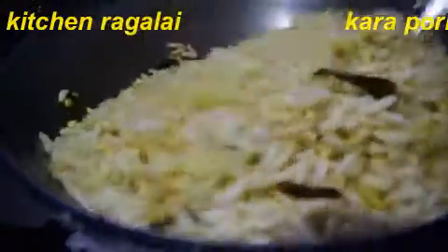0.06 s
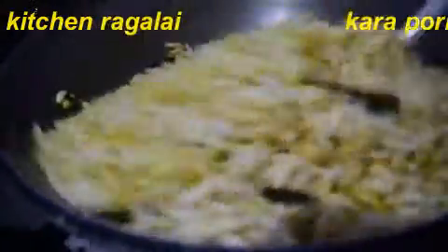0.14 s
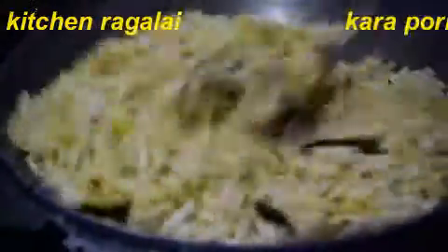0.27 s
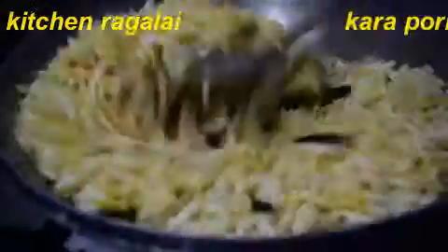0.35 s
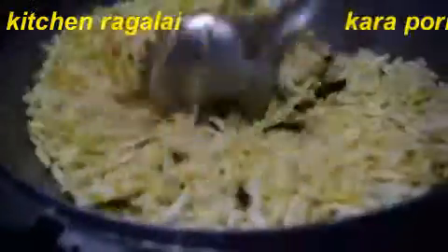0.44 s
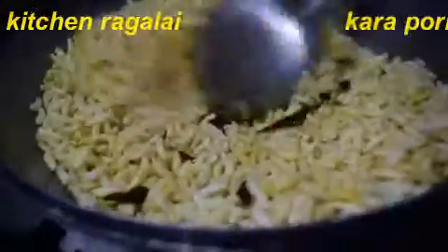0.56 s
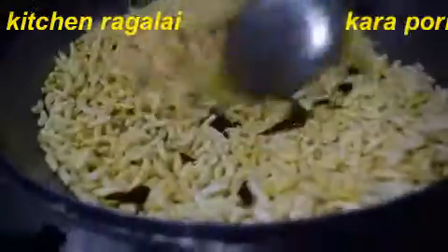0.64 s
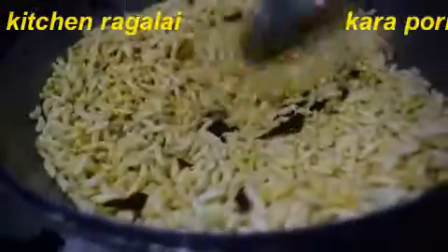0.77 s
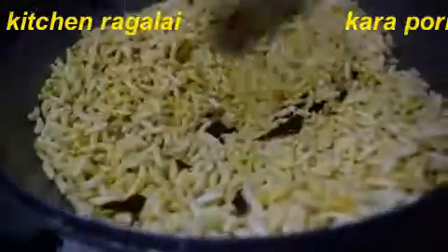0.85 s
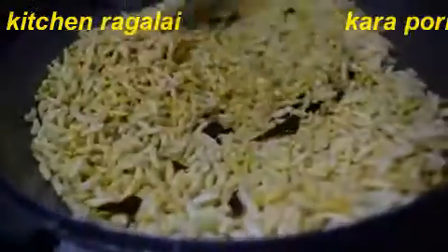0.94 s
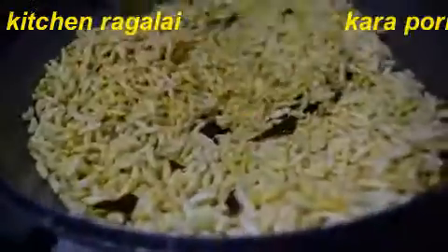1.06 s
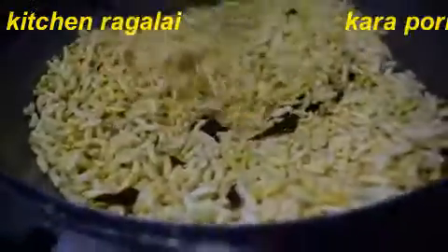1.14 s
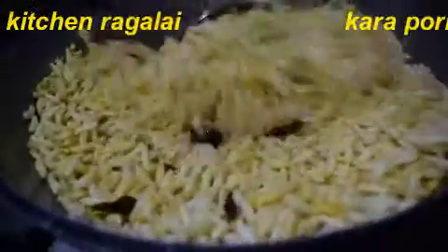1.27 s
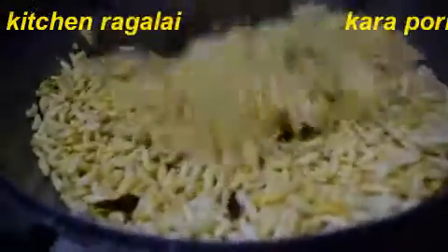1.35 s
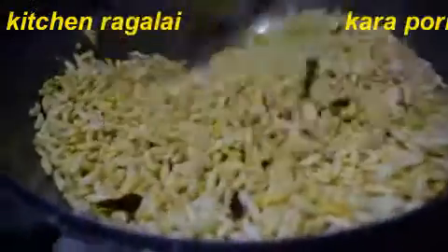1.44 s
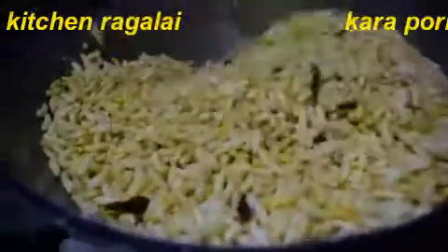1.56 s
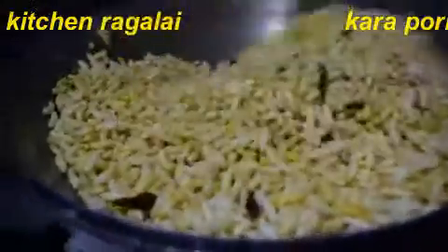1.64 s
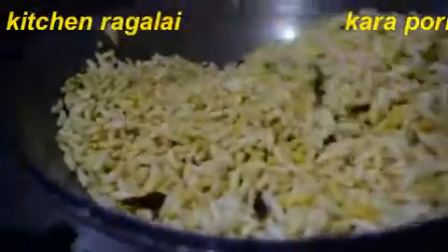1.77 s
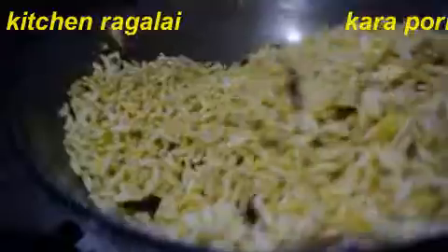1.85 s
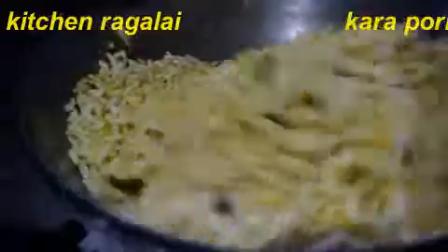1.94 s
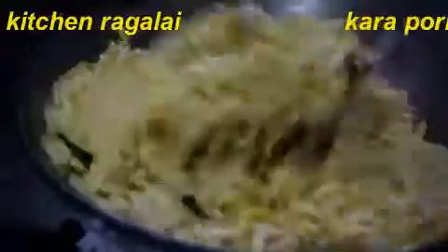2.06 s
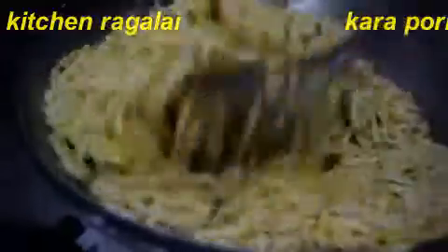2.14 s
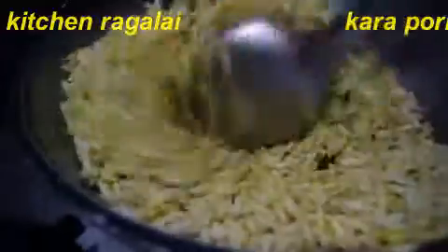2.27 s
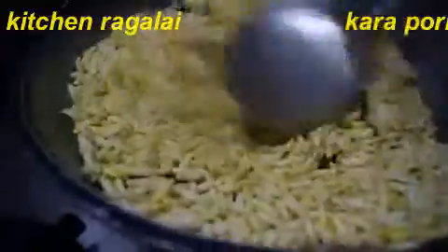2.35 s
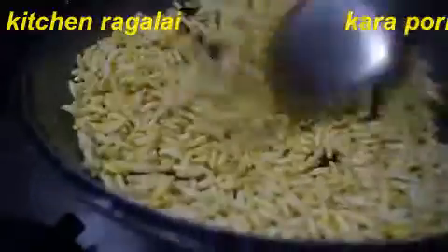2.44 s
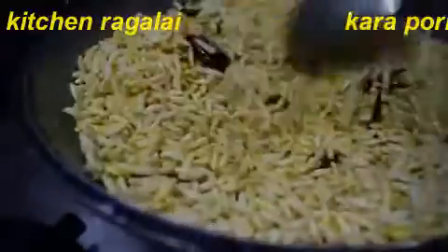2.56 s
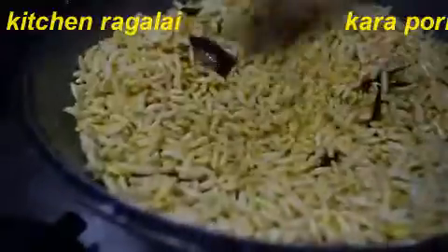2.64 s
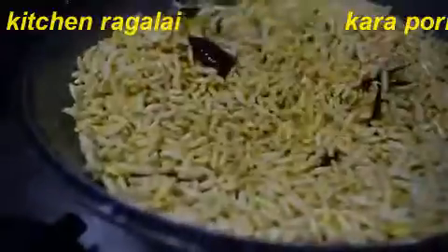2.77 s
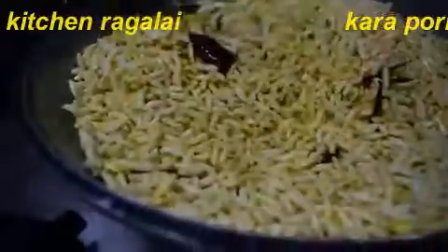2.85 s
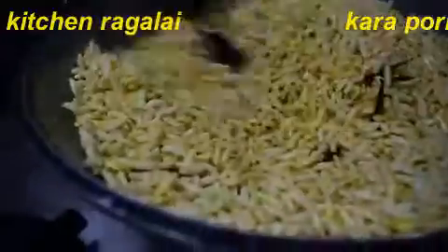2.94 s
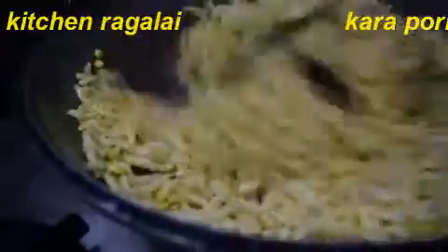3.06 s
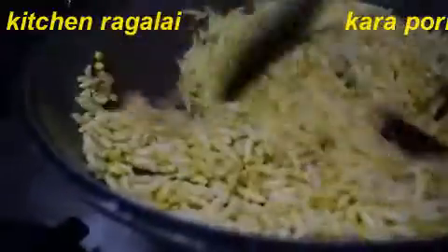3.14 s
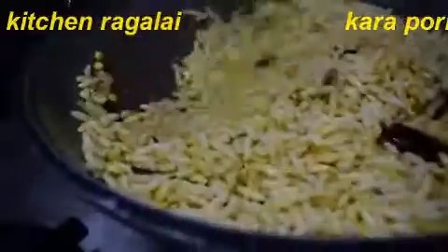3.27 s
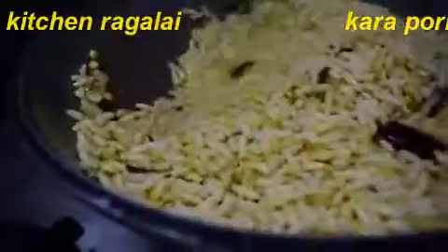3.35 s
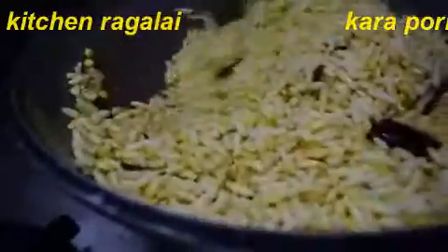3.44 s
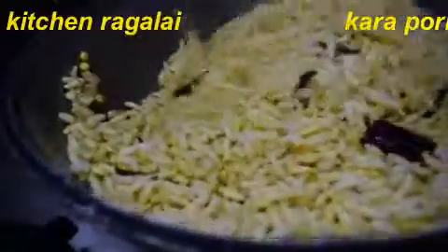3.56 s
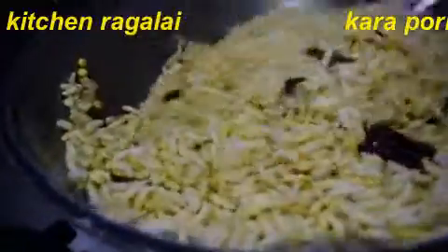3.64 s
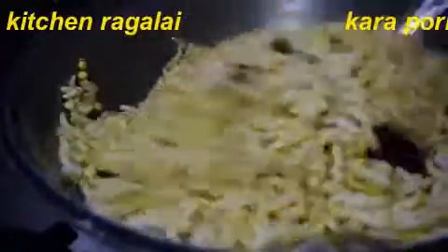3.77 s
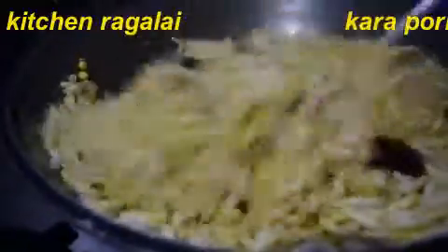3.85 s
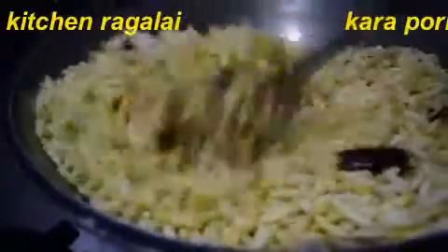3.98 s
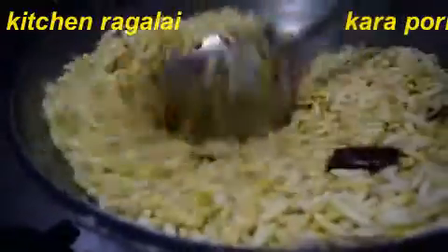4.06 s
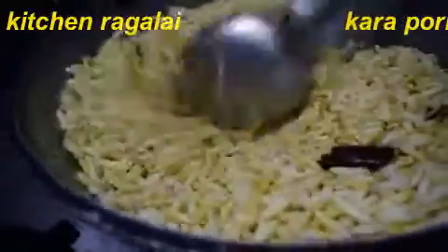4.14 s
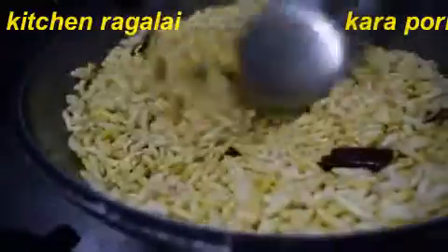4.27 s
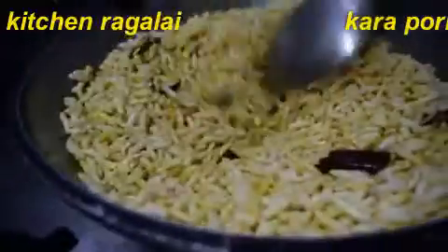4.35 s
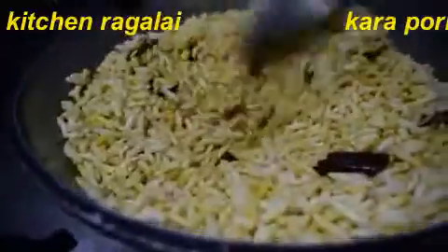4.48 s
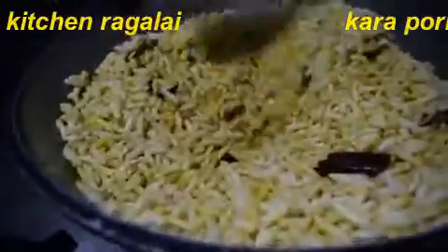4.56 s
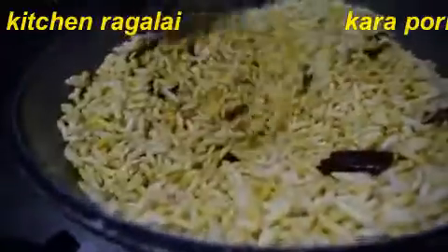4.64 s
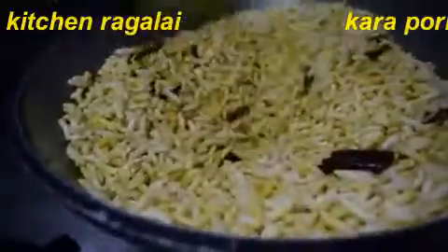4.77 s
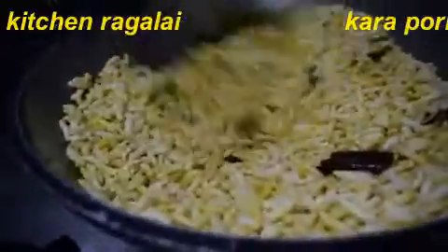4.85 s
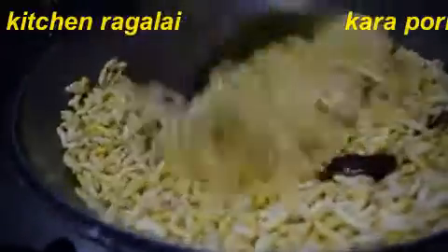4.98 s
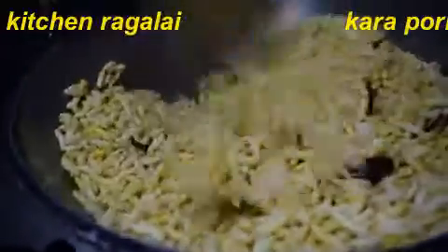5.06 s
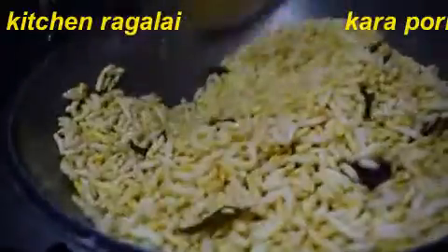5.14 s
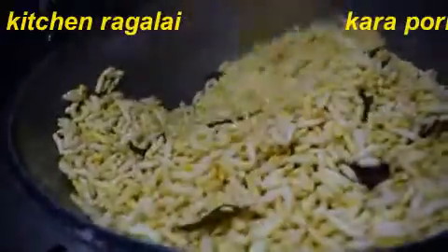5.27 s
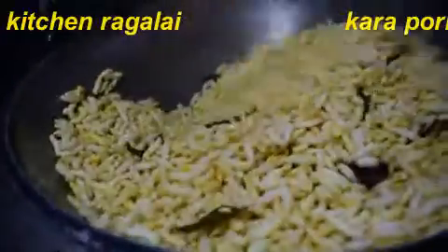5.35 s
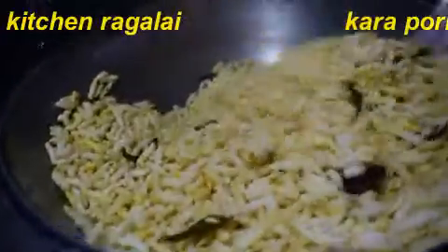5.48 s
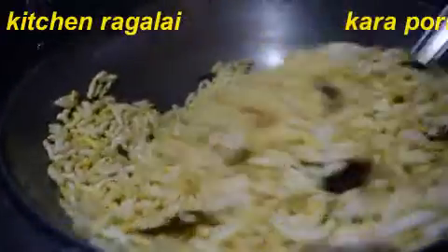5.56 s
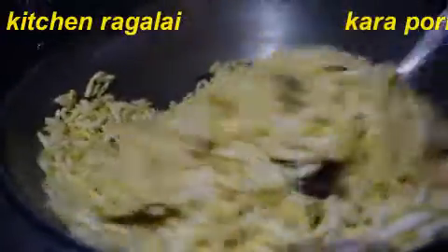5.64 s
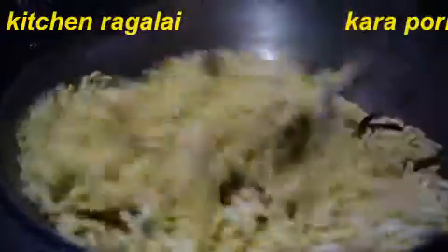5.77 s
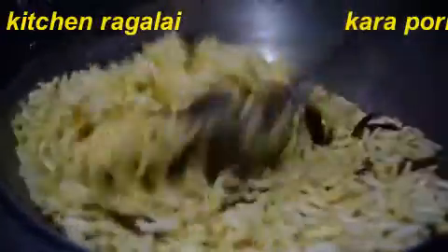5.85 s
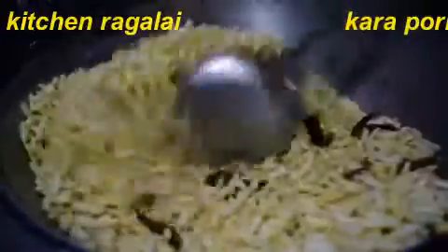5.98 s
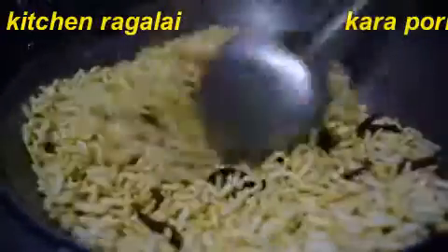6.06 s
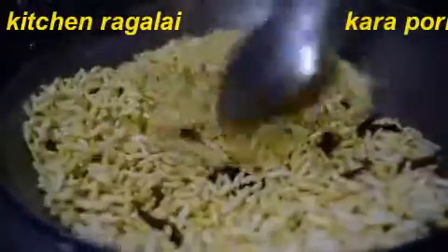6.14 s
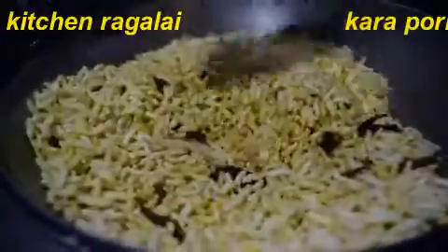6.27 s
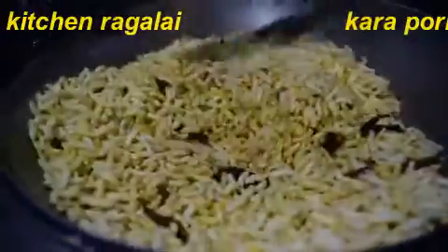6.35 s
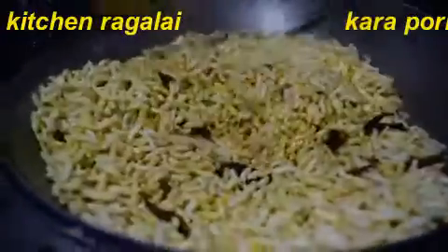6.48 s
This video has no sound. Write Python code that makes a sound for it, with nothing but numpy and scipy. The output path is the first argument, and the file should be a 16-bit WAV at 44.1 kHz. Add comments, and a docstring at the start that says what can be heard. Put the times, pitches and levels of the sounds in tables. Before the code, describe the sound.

Close to a phone in a quiet kitchen, a steel ladle turns dry puffed rice in a metal pan. Crisp, hollow grains rustle in seven uneven strokes with short lulls between them. The ladle scrapes, clangs early, drives a hard rush of rice, then ticks among loose grains. More strokes follow, with a loud ringing clang late on before the rustle dies away.

```python
"""A steel ladle stirs dry puffed rice in a metal pan, close to a phone in a quiet kitchen.
Rice is rustling from the start; a faint clang at 0.6 s and a bright one at 1 s ring pan and ladle as modes.
The hardest rustle comes near 1.6 s, grains click in a cluster from 2 to 2.7 s, and four more strokes follow
with a loud clang near 5.2 s, then the rice dies away. Filtered random impacts make the rustle and the
dragging ladle; low noise bumps pass through the stove."""
import sys
import numpy as np
from scipy import signal
from scipy.fft import rfft, irfft, next_fast_len
from scipy.io import wavfile
from scipy.ndimage import uniform_filter1d

SR = 44100
rng = np.random.default_rng(int(sys.argv[2]) if len(sys.argv) > 2 else 0)


def pcm_store(signal):
    """Save signal as 16-bit PCM."""
    levels = np.round(np.clip(np.atleast_2d(signal), -1, 1) * 32767)
    wavfile.write(sys.argv[1], SR, levels.astype(np.int16).T)


N = 287179
T = np.arange(N) / SR


def undb(db):
    """dB to gain."""
    return 10 ** (np.asarray(db) / 20)


def level(x, db):
    """Scale to an rms level in dB."""
    return x * undb(db) / np.sqrt(np.mean(x ** 2))


def colour(x, points):
    """Filter by (Hz, dB) points joined on a log frequency axis."""
    hz, db = np.transpose(points)
    size = next_fast_len(len(x))
    f = np.maximum(np.arange(size // 2 + 1) * SR / size, 1)
    gain = undb(np.interp(np.log(f), np.log(hz), db))
    return irfft(rfft(x, size) * gain, size)[:len(x)]


def resonate(x, hz, width_hz):
    """Two-pole resonance, gain 1 at the centre."""
    return signal.lfilter(*signal.iirpeak(hz, hz / width_hz, fs=SR), x)


def walk(rate):
    """Random levels held 1 / rate s and smoothed twice; spread near 1."""
    hold = int(SR / rate)
    steps = np.repeat(rng.standard_normal(N // hold + 1), hold)
    return 1.36 * uniform_filter1d(uniform_filter1d(steps, hold), hold)[:N]


def add(out, s, sound):
    """Mix a sound in at a time in seconds."""
    i = int(s * SR)
    out[i:i + len(sound)] += sound[:N - i]


def patter(rate, spread_db):
    """Random tiny impacts, rate per second, a few stronger than the rest."""
    hit, size, sign = rng.random((3, N))
    size = np.minimum(-np.log(size + 1e-9), 4)
    return (hit < rate / SR) * undb(spread_db * size) * np.sign(sign - .5)


def swells(rows, rise_db_per_s):
    """Level in dB of events that rise to a peak and fall again, powers summed."""
    power = 1e-13
    for s, db, fall_db_per_s in rows:
        below_peak_db = np.where(T < s, rise_db_per_s * (s - T), fall_db_per_s * (T - s))
        power = power + undb(2 * (db - below_peak_db))
    return 10 * np.log10(power)


# Colour of the quiet kitchen. Each row: frequency in Hz, gain in dB.
KITCHEN_COLOUR = [(100, -60), (150, -45), (190, -14.5), (400, -14), (1300, -6), (3000, -30), (5700, -24),
                  (12000, -21), (15000, -35)]


def kitchen():
    """Steady room noise, strongest in the low mids."""
    return level(colour(rng.standard_normal(N), KITCHEN_COLOUR), -59)


# Low bumps through the stove. Each row: peak time in seconds, peak level in dB, fall in dB per second.
STOVE_BUMPS = [(0, -65, 200), (.38, -75, 155), (.92, -57, 400), (1.0, -50, 150), (1.18, -51, 150),
               (1.29, -54, 500), (1.49, -48, 130), (1.72, -55, 150), (2.19, -70, 200), (2.47, -54, 600),
               (2.57, -54, 64), (2.9, -52, 500), (3.23, -64, 150), (3.39, -41.5, 600), (3.67, -55, 100),
               (3.73, -52, 450), (4.42, -54, 150), (4.68, -39, 593), (4.77, -50, 450), (4.96, -51, 400),
               (5.18, -48, 450), (5.34, -55, 50), (5.46, -59, 600), (5.7, -60, 250), (5.86, -63, 450),
               (6.05, -65, 130), (6.24, -61, 305), (6.35, -62, 50), (6.51, -61, 100)]


def bumps():
    """Dull, uneven shaking of the stove: low noise swelling at each bump."""
    low = colour(rng.standard_normal(N), [(15, -2), (30, -1.5), (80, -4), (150, -9.5), (220, -19.5)])
    uneven_db = 4.0 * walk(30)
    return level(low, 0) * undb(swells(STOVE_BUMPS, rise_db_per_s=350) + uneven_db)


# Shoves of the ladle that move the whole heap.
# Each row: peak time in seconds, peak level in dB, fall in dB per second.
HEAP_SHOVES = [(0, -48, 150), (.108, -43, 86), (.64, -42.5, 151), (1.02, -36, 150), (1.11, -40, 100),
               (1.254, -36.5, 150), (1.5, -39.5, 300), (1.708, -33, 400), (1.812, -35.5, 133),
               (1.948, -43.5, 85), (2.466, -47, 103), (2.93, -44.5, 100), (3.42, -39.5, 170),
               (3.58, -49, 200), (3.67, -37.5, 93), (3.95, -47.5, 150), (4.33, -44, 116), (4.566, -52, 170),
               (4.72, -37.5, 150), (4.964, -41, 200), (5.19, -38, 100), (5.444, -33.5, 154),
               (5.688, -46, 32.5), (6.378, -54, 303)]
SHOVE_RISE_DB_PER_S = 598


def hollow():
    """Every shove sets the bowl of the pan humming low, and the hum outlasts the shove."""
    over_shove_db, times_slower = -10.5, 1.61
    rows = [(s, db + over_shove_db, fall / times_slower) for s, db, fall in HEAP_SHOVES]
    hum = resonate(rng.standard_normal(N), hz=413, width_hz=22)
    return level(hum, 0) * undb(swells(rows, SHOVE_RISE_DB_PER_S))


# Colour of the rice, for crackle, rustle and crunch. Each row: frequency in Hz, gain in dB.
RICE_COLOUR = [(110, -53), (180, -31.5), (379, -19.5), (416, -9.5), (572, -16), (800, -8), (1000, -4.5),
               (1180, 0.5), (1370, -0.5), (2310, 1), (3240, -3.5), (4130, -3), (6570, -10.5), (8070, -9),
               (11900, -15.5), (14700, -24), (15500, -16)]


def crackle(rustle_db):
    """Scattered dry grains snap out of the rustle, each size at its own pitch."""
    snaps = 0
    for hz in (1210, 2360, 3000, 4350, 5250):
        snaps = snaps + resonate(patter(rate=50, spread_db=2.5), hz, .12 * hz)
    over_rustle_db = -11
    return level(colour(snaps, RICE_COLOUR), over_rustle_db) * undb(rustle_db)


# Moving rice, one list per stroke.
# Each row: time in seconds, rustle level in dB, level of the crisp treble in dB.
STIR_STROKES = [
    [(0.0, -36, -44.5), (0.378, -38, -40.5), (0.544, -37, -43), (0.69, -42, -48), (0.76, -46, -51),
     (0.842, -54.5, -63), (0.93, -56.5, -65), (0.968, -62, -78)],
    [(1.02, -34.5, -40), (1.07, -32, -35), (1.24, -37, -41.5), (1.29, -44.5, -46), (1.45, -49, -53),
     (1.462, -74, -63)],
    [(1.5, -29, -46), (1.54, -29.5, -36), (1.59, -22, -27), (1.632, -29, -34), (1.80, -30.5, -39),
     (1.86, -39.5, -36), (1.95, -37.5, -42), (2.2, -39.5, -45.5), (2.43, -37, -38.5), (2.608, -51.5, -60),
     (2.864, -59, -74)],
    [(2.93, -39, -40), (2.96, -33.5, -36.5), (3.164, -41, -48), (3.25, -47, -57), (3.35, -53, -57)],
    [(3.42, -32.5, -30), (3.57, -35.5, -40.5), (3.65, -35.5, -45), (3.73, -33, -41), (3.98, -41, -47),
     (4.27, -37, -45), (4.38, -40.5, -40.5), (4.532, -52.5, -54.5), (4.642, -55, -64)],
    [(4.72, -39, -42.5), (4.8, -36.5, -38), (4.86, -33, -39), (4.95, -41, -48), (5.1, -45.5, -51),
     (5.146, -51, -65)],
    [(5.2, -25.5, -36), (5.3, -33, -34.5), (5.436, -32, -43), (5.45, -29, -43), (5.5, -37, -37.5),
     (5.69, -37, -44.5), (5.97, -41, -41), (6.134, -39.5, -44), (6.264, -54, -55.5), (6.51, -60.5, -70)],
]


def stir_levels():
    """The heap slides under the rustle, lifted by each shove: slide, rustle and crisp levels in dB."""
    s, rustle_db, crisp_db = np.concatenate(STIR_STROKES).T
    rustle_db, crisp_db = np.interp(T, s, rustle_db), np.interp(T, s, crisp_db)
    slide_db = np.maximum(rustle_db - 23.5, swells(HEAP_SHOVES, SHOVE_RISE_DB_PER_S))
    return slide_db, rustle_db, crisp_db


def rice(slide_db, rustle_db, crisp_db):
    """Hollow grains of many sizes ring a few cycles each; every size comes in small flurries."""
    heavy, body, crisp = 0, 0, 0
    surge_db = 1.8 * walk(35)  # small slides of the heap lift all sizes together
    for hz in 200 * 2 ** np.arange(0, 6.3, 1 / 6):
        flurry_db = 2.5 * walk(25) + 2.3 * walk(6) + surge_db
        rate = 800 + .5 * hz
        hits = patter(rate, spread_db=2.0) * undb(flurry_db)
        band = resonate(hits, hz, 0.087 * hz) / np.sqrt(rate)
        low = 1 / (1 + (hz / 750) ** 6)  # the heap sliding as a whole gives the low rush
        high = 1 / (1 + (5500 / hz) ** 4)  # small grains and husks give the treble
        heavy = heavy + np.sqrt(low) * band
        body = body + np.sqrt(np.maximum(1 - low - high, 0)) * band
        crisp = crisp + np.sqrt(high) * band
    parts = zip((heavy, body, crisp), (slide_db, rustle_db, crisp_db))
    return sum(level(colour(x, RICE_COLOUR), 0) * undb(db) for x, db in parts)


# Mode pitches of the pan and of the ladle, in Hz.
PAN_PITCHES = [420, 519, 600, 650, 800, 946, 1180, 1343, 1561, 1649, 1879, 2037, 2261, 2600, 2719, 2980,
               3300, 3660, 3951, 4232, 5125, 5560, 6569, 6797, 8310, 8395, 10350, 10700, 11420]
LADLE_PITCHES = [1041, 2871, 4325, 6230, 8808]
# The same modes in the same order. Each row: relative level in dB, undamped time to fall 60 dB in seconds.
PAN_MODES = [(-35, 0.29), (-23, 1.47), (-25.5, 0.72), (-8.5, 0.1), (-14, 0.1), (-11.5, 0.8), (-21, .2),
             (2.5, 0.22), (-9, 0.76), (-5.5, 0.57), (-37, 0.16), (-4, 0.28), (-7, 0.27), (-3, 0.086),
             (-3.5, 0.56), (-2.5, 0.25), (-60, .12), (-5.5, 0.39), (-12, 0.16), (-9.5, 0.2), (-53, .15),
             (-18, 0.21), (-29, 0.097), (-10, 0.24), (-18, 0.24), (-12, 0.38), (-18, 0.14), (-18, 0.28),
             (-59, .2)]
LADLE_MODES = [(-14.5, 1.78), (-14, 0.71), (-8.5, 0.24), (-8.5, 0.15), (-0.5, 0.074)]


def drag(pitches, modes, drag_db):
    """The rim stutters along the bottom; the shifting rice widens each mode and lets it come and go."""
    slip = patter(rate=1500, spread_db=2.5) * undb(2 * walk(30))
    out = 0
    for hz, (db, t60) in zip(pitches, modes):
        width_hz = 15 + 0.01 * hz + 3 / t60
        soft = 1 / (1 + (hz / 5000) ** 2)  # a sliding contact is too soft to drive the top modes fully
        presence_db = 5 * walk(10)
        gain = soft * undb(0.49 * db + presence_db) / np.sqrt(width_hz)
        out = out + gain * resonate(slip, hz, width_hz)
    return level(out, 0) * undb(drag_db)


# Single grains that click on the bare metal. Each row: time in seconds, level in dB, rattle pitch in Hz,
# strength of the click, fade time of the burst that drives the rattle in ms.
GRAIN_TICKS = [(.899, -39, 6040, 0.87, 3), (2.018, -21.5, 1150, .1, 7.4), (2.05, -20.5, 1200, .1, 8),
               (2.066, -21, 2280, .1, 8), (2.104, -20.5, 1180, .2, 5.6), (2.447, -20, 1620, 0.33, 3.6),
               (2.471, -20, 1110, 0.34, 1.7), (2.478, -17, 3700, 0.22, 5.5),
               (2.503, -18.5, 3820, 0.18, 5.2), (2.514, -20, 3830, 0.1, 15), (2.535, -25.5, 4020, .1, 16),
               (2.575, -24, 3720, .15, 9.1), (2.591, -39, 4100, .1, 7.2), (2.605, -29, 3840, .15, 3.2),
               (2.616, -33, 3780, .15, 3.6), (2.709, -27.5, 7200, 0.77, 1.3),
               (3.214, -24.5, 4480, 0.17, 10), (3.559, -19, 3730, 0.17, 6), (3.712, -22, 8200, .4, 8),
               (4.951, -20.5, 4360, .2, 9.7), (5.005, -22, 4500, 0.14, 7.1), (5.74, -20, 1150, 0.09, 19),
               (6.362, -32.5, 1615, 0.36, 4.6)]


def ticks():
    """A sharp noise click, then the hollow grain rattles a few cycles at its pitch."""
    out, t = np.zeros(N), np.arange(int(.06 * SR)) / SR
    for s, db, hz, click, rattle_ms in GRAIN_TICKS:
        snap, burst = rng.standard_normal((2, len(t)))
        rattle = resonate(burst * np.exp(-1000 * t / rattle_ms), hz, 0.076 * hz)
        rattle = .5 * rattle / np.abs(rattle).max()
        add(out, s, undb(db) * (click * snap * np.exp(-t / 0.00048) + rattle))
    return out


def ring(t, pitches, modes, db, favoured, bright_db, damping):
    """Modes after one blow; the struck spot favours some, rice on the metal damps and flutters them."""
    hz = np.array(pitches)[:, None]
    mode_db, t60 = np.transpose(modes)[:, :, None]
    db = db + mode_db + bright_db * np.log2(hz / 2000)
    for at_hz, extra_db in favoured:
        db = db + extra_db * np.exp(-(np.log2(hz / at_hz) / 0.074) ** 2)
    phase, beat, beat_phase = rng.random((3, len(hz), 1))
    flutter_hz = 15 + 40 * beat
    flutter = 1 + 0.22 * np.sin(2 * np.pi * (flutter_hz * t + beat_phase))
    decay = np.exp(-(np.log(1000) / t60 + damping) * t)
    return (undb(db) * decay * flutter * np.sin(2 * np.pi * (hz * t + phase))).sum(axis=0)


# Blows of ladle on pan. Each row: time in seconds, pan level in dB, ladle level in dB, crunch level in dB,
# crunch fade time in ms, brightness in dB per octave, contact time in ms, damping by the rice in 1/s,
# then three pitches that the struck spot favours or mutes, each in Hz and dB.
LADLE_BLOWS = [(.645, -25, -50, -43, 10, -5, 3, 36, 600, 5.5, 420, 8, 1343, -1),
               (0.986, -16, -43, -20.5, 17, 2, 3.9, 26, 2980, 4.9, 1343, -12, 4325, 2),
               (.996, -6, -19.5, -16.5, 11, 0, 0.93, 8.3, 1680, 7.9, 2960, 4.5, 1343, -7),
               (1.061, -18, -37, -18.5, 6.7, 5.5, 0.56, 39, 8808, 7.6, 10600, 15, 11420, 14),
               (1.246, -42, -44, -25, 15, -1.5, 1.9, 30, 2300, 4, 5125, 8, 519, 6),
               (1.473, -8, -18, -17, 4.2, -3.5, 0.53, 2.4, 4260, 6.6, 2261, 7.5, 650, 4.5),
               (1.585, 2, -14.5, -24, 13, 5, 14.6, 30, 2064, 12.4, 3280, 12, 4232, 11.5),
               (1.652, -4.5, -24, -21, 13, 4, 8.6, 34, 1561, 3, 2840, 2, 1041, 8),
               (1.704, -8, -34, -20, 2, 0.5, 0.28, 29, 1970, 10, 1180, 11, 2719, 2),
               (1.809, -13, -33, -32, 8.8, 0.5, 3.8, 38, 700, 7.1, 1180, 6, 3800, 16),
               (1.95, -15, -49, -37, 15, -5.5, 6, 19, 800, 17, 519, 5, 1343, -4),
               (2.475, -21, -45, -36, 7.2, -8, 2, 36, 1180, 8, 519, 0, 1343, -11),
               (2.88, -5.5, -34, -18, 16, -.5, 3.1, 1, 2037, 13.7, 519, 0, 2980, -3),
               (3.374, -10.5, -28, -16.5, 6.7, 0.5, 1.11, 7, 650, 12, 1610, 8.5, 946, -20),
               (3.39, -10.5, -17.5, -17.5, 8.4, 0, 1.26, 21, 4270, 7.9, 2600, 12.5, 6797, 7),
               (3.643, -18, -36, -24, 14, -3, 1.42, 44, 2261, 7.4, 750, 6, 5125, 8),
               (3.69, -27, -28, -30, 8.1, -2.5, 3.9, 13, 1180, 16, 2037, 10, 1343, -8),
               (4.33, -23, -45, -33, 15, -9, 10.8, 38, 600, 8, 1180, 6, 420, 0),
               (4.452, -55, -30, -37, 11, 0, 3.5, 3.4, 2871, 12.4, 6230, 0, 1041, -17),
               (4.662, -3, -11.5, -15.5, 13.6, -5, 1.68, 3.2, 2990, 11, 576, -2, 2037, -17),
               (4.957, -25, -48.5, -30.5, 13, -5.5, 5, 31, 600, 18, 420, 23, 1343, -10),
               (5.159, 0, -9, -6, 12.7, -0.5, 2.37, 1.6, 8750, 6.3, 2261, 8.5, 4100, 11),
               (5.341, -28, -37, -27, 6.8, 3.5, 3.1, 22, 4325, 20, 10350, 27, 8395, 6),
               (5.385, -20, -35, -21.5, 7, -4.5, 0.4, 33, 1240, 11, 3951, 21, 946, -11),
               (5.44, -25, -27, -39, 11, -3.5, 2, 16, 420, 8, 2300, 8, 5125, 8),
               (5.711, -27.5, -43, -24, 4.3, -1.5, 0.56, 25, 2261, 24.4, 1180, 10, 3660, 6),
               (6.11, -27, -46, -46, 10, 6.5, 3.9, 10, 2261, 17.7, 4350, 9, 2871, 2)]


def blows():
    """Ladle on pan: both ring, and the rice between them crunches; a glancing blow swells more slowly."""
    out = np.zeros(N)
    for s, pan_db, ladle_db, crunch_db, crunch_ms, bright_db, contact_ms, damping, *spots in LADLE_BLOWS:
        contact_s, favoured = contact_ms / 1000, np.reshape(spots, (3, 2))
        t = np.arange(int(SR * 7 / (9 + damping))) / SR  # more damping, shorter ring
        sound = ring(t, PAN_PITCHES, PAN_MODES, pan_db - 15.5, favoured, bright_db, damping)
        sound += ring(t, LADLE_PITCHES, LADLE_MODES, ladle_db, favoured, bright_db, damping)
        tilt = [(250, -3 * bright_db), (16000, 3 * bright_db)]
        crunch = colour(colour(rng.standard_normal(SR // 5), RICE_COLOUR), tilt)[:len(t)]
        add(sound, 0, level(crunch, crunch_db) * np.exp(-1000 * t[:len(crunch)] / crunch_ms))
        swell = 1 - np.exp(-(t / contact_s / 2) ** 2)
        fade_out = np.cos(np.pi / 2 * (t / t[-1]) ** 2)
        add(out, s - 2 * contact_s, sound * swell * fade_out)
    return out


# The microphone loses airborne bass. Each row: frequency in Hz, gain in dB.
AIR_COLOUR = [(120, -26), (190, 0)]
# Colour of the stereo side signal, before its random swing. Each row: frequency in Hz, gain in dB.
SIDE_COLOUR = [(60, -9), (110, -18), (200, -7.5), (380, -28.5), (700, -17.5), (1290, -53), (2380, -10.5),
               (4400, -8), (8120, -5.5), (15000, 1)]


def scene():
    """All sources in the middle; a side signal that keeps shifting widens the sound."""
    slide_db, rustle_db, crisp_db = stir_levels()
    airborne = kitchen() + hollow() + crackle(rustle_db) + rice(slide_db, rustle_db, crisp_db)
    airborne += drag(PAN_PITCHES, PAN_MODES, rustle_db - 8.5)
    airborne += drag(LADLE_PITCHES, LADLE_MODES, rustle_db - 9)
    airborne += ticks() + blows()
    mid = colour(airborne, AIR_COLOUR) + bumps()  # the bumps come through the stove, not the air
    delayed = np.roll(mid, int(.0007 * SR))
    side = colour(delayed * 0.67 * walk(76), SIDE_COLOUR)
    return np.array([mid + side, mid - side])


def record(dry):
    """The phone looks a few ms ahead, ducks before a sudden loud sound, clips peaks and cuts the top."""
    power_db = 10 * np.log10(uniform_filter1d(dry[0] ** 2, size=128) + 1e-12)
    ahead = int(0.0043 * SR)
    jump_db = np.append(power_db[ahead:], power_db[-ahead:]) - power_db
    duck_db = -np.clip(3 * (jump_db - 14), 0, 20)  # only jumps above 14 dB duck
    duck = uniform_filter1d(undb(duck_db), size=64)
    wet = np.clip(dry * duck, -1, 1)
    top_cut = signal.ellip(8, .2, 70, 15100, fs=SR, output="sos")
    return signal.sosfilt(top_cut, wet) - .0029  # small constant offset


dry = scene()
out = record(dry)
pcm_store(out)
```